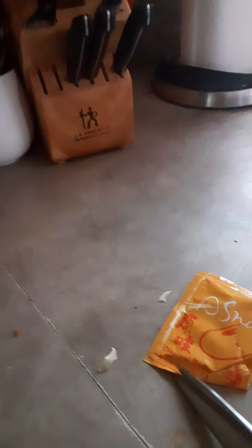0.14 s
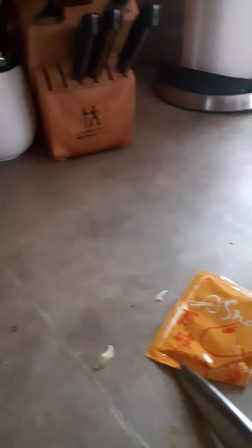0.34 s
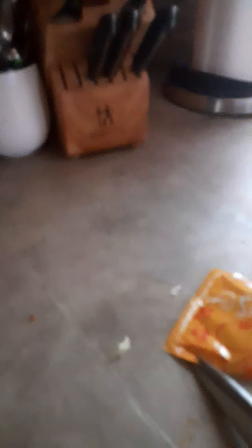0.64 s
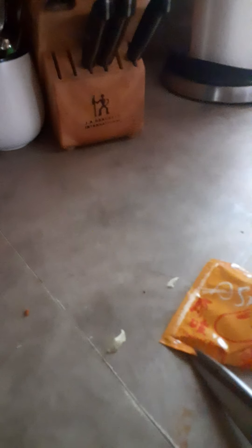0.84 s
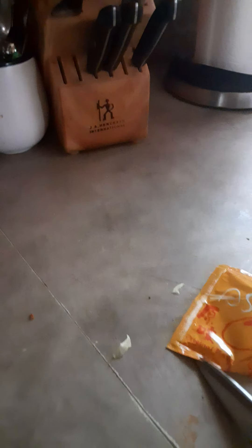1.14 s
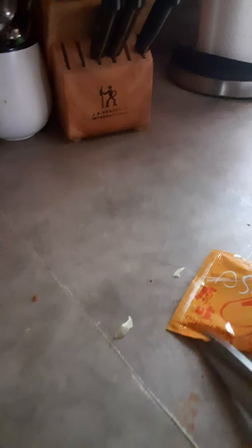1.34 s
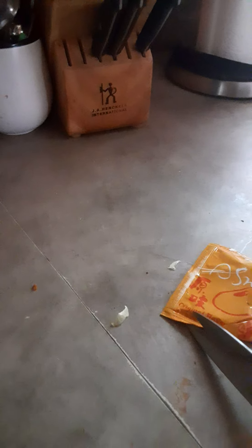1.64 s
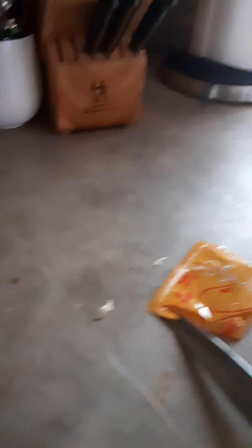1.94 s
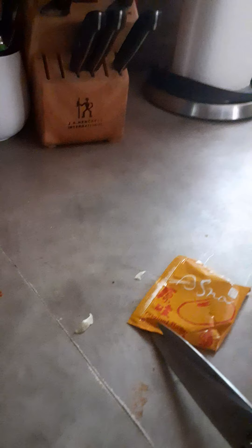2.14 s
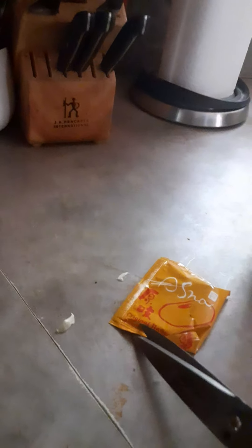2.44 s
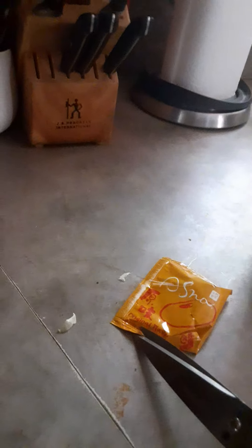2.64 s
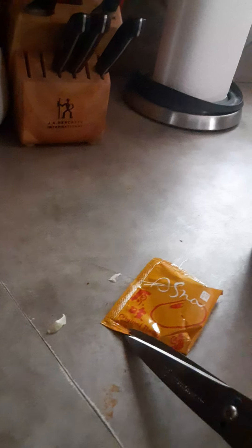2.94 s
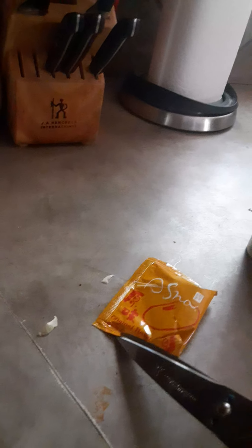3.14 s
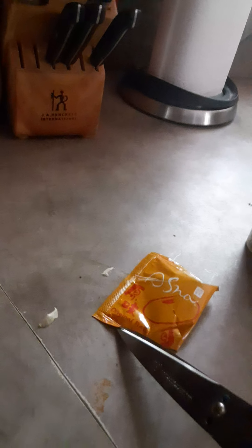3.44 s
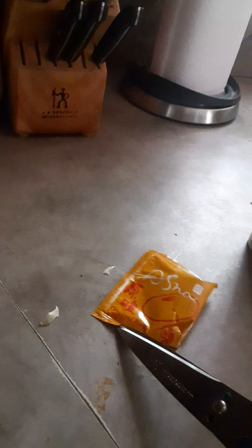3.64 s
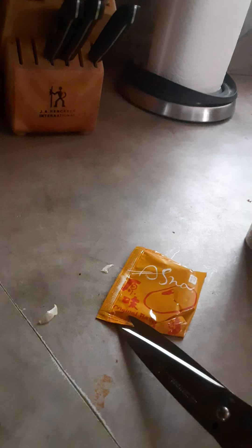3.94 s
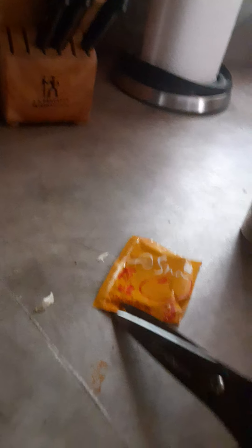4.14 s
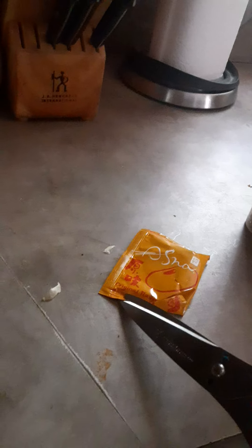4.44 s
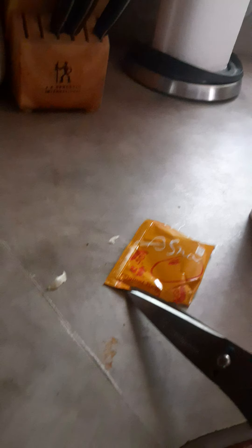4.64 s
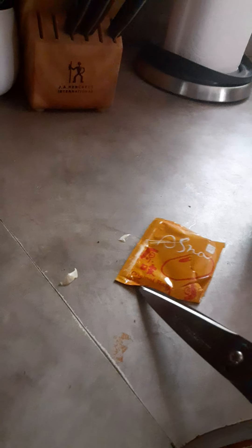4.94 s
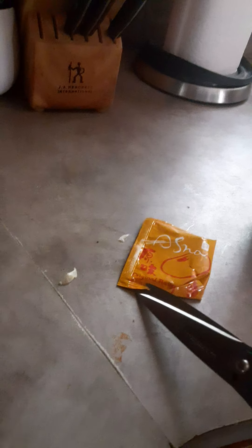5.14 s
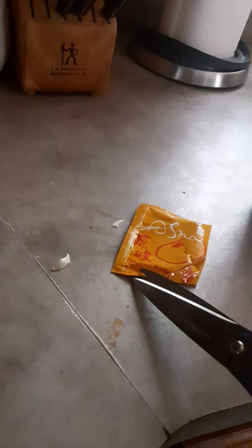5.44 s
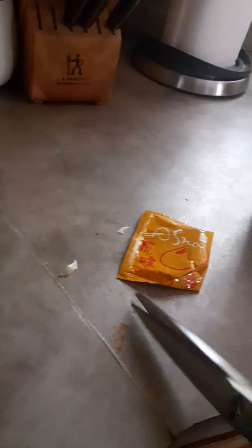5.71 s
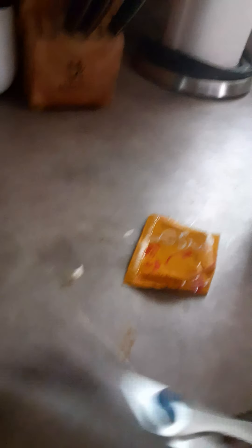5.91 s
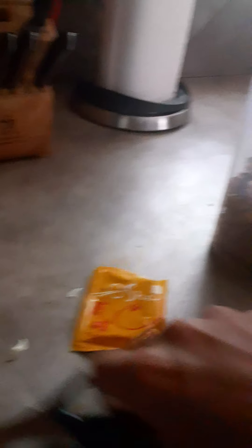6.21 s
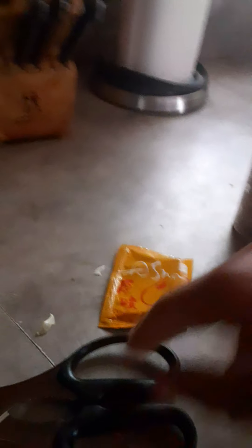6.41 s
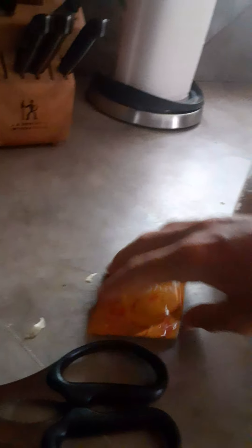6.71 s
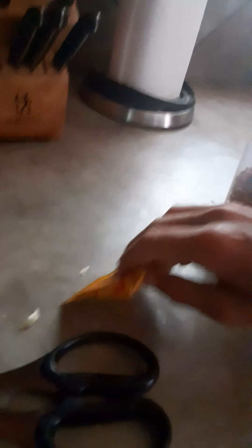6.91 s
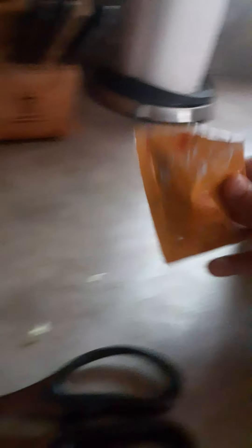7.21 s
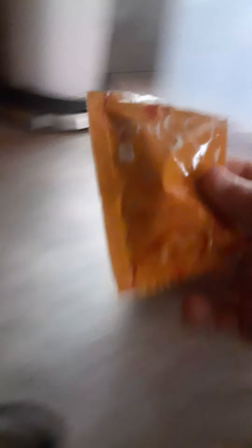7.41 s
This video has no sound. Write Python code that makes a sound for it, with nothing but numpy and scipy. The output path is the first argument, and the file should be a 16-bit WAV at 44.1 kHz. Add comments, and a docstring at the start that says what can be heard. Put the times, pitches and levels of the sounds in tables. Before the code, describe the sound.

Scissors snip sharply at a crinkling plastic sachet, then are put down on a stone counter with a louder scraping clatter.

```python
"""Kitchen scissors nibble at a plastic sachet on a stone counter, heard up close.
Each snip is a short run of tiny cracks that rings the blades, with a low jolt as the film gives way.
The film rustles and pops between cuts. The scissors are laid down, slid and dropped with a clatter,
and the sachet is picked up. The small kitchen rings over a mains hum and faint rumbles."""
import sys
import numpy as np
from scipy import signal
from scipy.fft import rfft, irfft, next_fast_len
from scipy.io import wavfile

SR = 44100
rng = np.random.default_rng(int(sys.argv[2]) if len(sys.argv) > 2 else 0)


def wav_out(sig):
    """Save sig, one row per channel (or a flat mono array), as 16-bit PCM at SR to the path in sys.argv[1]."""
    wavfile.write(sys.argv[1], SR, np.round(np.clip(np.atleast_2d(sig).T, -1, 1) * 32767).astype(np.int16))


N = 333725


def undb(db):
    """Decibels to gain."""
    return 10 ** (np.asarray(db) / 20)


def unit(x):
    """Scale to rms 1."""
    return x / np.sqrt(np.mean(x ** 2) + 1e-30)


def pan(left_db):
    """Stereo gains that put the left channel left_db above the right."""
    return undb(np.array([[1], [-1]]) * left_db / 2)


def add(out, x, start_s):
    """Mix a stereo sound into the track, dropping what falls outside."""
    i = int(start_s * SR)
    a, b = max(i, 0), min(i + x.shape[1], N)
    out[:, a:b] += x[:, a - i:b - i]


def band(x, low_hz, high_hz, order=2):
    """Causal band-pass."""
    return signal.sosfilt(signal.butter(order, [low_hz, high_hz], "band", fs=SR, output="sos"), x)


def highpass(x, hz, order):
    """Causal low cut."""
    return signal.sosfilt(signal.butter(order, hz, "high", fs=SR, output="sos"), x)


def colour(x, points):
    """EQ a sound along (freq_hz, gain_db) points."""
    hz, db = np.transpose(points)
    size = next_fast_len(x.shape[-1])
    bins_hz = np.arange(size // 2 + 1) * SR / size
    gain = undb(np.interp(np.log(bins_hz + 1), np.log(hz), db))
    return irfft(rfft(x, size) * gain, size)[..., :x.shape[-1]]


def stereo_noise(n, mono_below_hz):
    """Diffuse noise: centred in the bass, wide in the treble."""
    mid, side = rng.standard_normal((2, n))
    side = highpass(side, mono_below_hz, order=1)
    return np.array([mid + side, mid - side])


def resonate(x, modes):
    """Damped resonances side by side, each with gain 1 at its centre before its own dB."""
    out = np.zeros_like(x)
    for hz, width_hz, db in modes:
        r = np.exp(-np.pi * width_hz / SR)
        feedback = [1, -(1 + r * r) * np.cos(2 * np.pi * hz / SR), r * r]
        out += undb(db) * (1 - r * r) / 2 * signal.lfilter([1, 0, -1], feedback, x)
    return out


def damped(modes, factor):
    """Widen the modes: pressure on a part shortens its ring."""
    return [(hz, width_hz * factor, db) for hz, width_hz, db in modes]


def swell(t, rise_s, fall_s):
    """Force that builds to a crest at t = 0 and then lets go."""
    return np.exp(-np.where(t < 0, (t / rise_s) ** 2, np.abs(t / fall_s) ** 1.04))


def cracks(n, rate_hz, spread_db):
    """Tiny slips and fractures at random moments, most small and a few large."""
    fires = rng.random(n) < rate_hz / SR
    polarity = np.sign(rng.standard_normal(n))
    size_db = -spread_db * np.log(1 - .98 * rng.random(n))
    return fires * polarity * undb(size_db)


# The four registers of a contact (thump, body, ring, crackle): low_hz, high_hz
REGISTERS = [(75, 520), (520, 2500), (2500, 6500), (6500, 17000)]

def excite(force, levels_db, modes, rate_hz, spread_db, width, lag_s, pan_db, blow=(0, 0, 0, 0)):
    """Cracks follow the force and ring the modes; levels, pan and a blow at the crest go by register."""
    n, out = len(force), 0
    for k, (low_hz, high_hz) in enumerate(REGISTERS):
        mid, side = (unit(force * cracks(n, rate_hz, spread_db)) for _ in range(2))
        mid[np.argmax(force)] += blow[k] * np.sqrt(n)
        side = width * highpass(side, hz=1200, order=2)
        register_modes = [mode for mode in modes if low_hz <= mode[0] < high_hz]
        ring = resonate(np.array([mid + side, mid - side]), register_modes)
        left, right = band(ring, low_hz, high_hz)
        ring = np.array([unit(left), np.roll(unit(right), int(lag_s * SR))])
        out = out + ring * undb(levels_db[k]) * pan(pan_db[k])
    return out * np.sqrt(np.mean(force ** 2))


# Brightness tilt, one value a register: gain_db per brightness_db
BRIGHTNESS_TILT = [-0.58, -.5, .25, 0.49]

def contacts(rows, modes, balance_db, rise_share, **touch):
    """Play a cue list; balance and brightness offset each cue's level, register by register."""
    out = np.zeros((2, N))
    for crest_s, fall_s, level_db, brightness_db, *_ in rows:
        rise_s = rise_share * fall_s
        t = np.arange(-int(3 * rise_s * SR), int((4 * fall_s + .06) * SR)) / SR
        levels_db = level_db + np.array(balance_db) + brightness_db * np.array(BRIGHTNESS_TILT)
        add(out, excite(swell(t, rise_s, fall_s), levels_db, modes, **touch), crest_s + t[0])
    return out


# Partials of the mains hum: pitch_hz, level_db
HUM_PARTIALS = [(59.2, -76), (118.4, -67), (177.6, -81), (242.2, -76), (301.5, -71), (602.9, -86)]
# EQ of the room's air: freq_hz, gain_db
AIR_EQ = [(20, -41), (35, -24.5), (55, -15), (85, -10.5), (120, -2.5), (155, -12), (300, -10.5),
          (520, -19.5), (1000, -24), (2200, -25), (4000, -28), (6000, -35), (9700, -40), (12500, -34),
          (16000, -35)]
# Fader ride on hum and air together: time_s, gain_db
ROOM_FADER = [(0, 2), (3.3, 1.5), (4, 3), (6.9, 1.5), (7.15, -2)]

def room_tone(air_db=-63):
    """An appliance hums, wavering a little, over the still air of the room."""
    t, hum = np.arange(N) / SR, np.zeros(N)
    for hz, db in HUM_PARTIALS:
        waver = np.interp(t, np.linspace(0, N / SR, 60), rng.standard_normal(60))
        phase = 2 * np.pi * (hz * t + rng.random()) + .35 * waver
        hum += np.sqrt(2) * undb(db + 1.5 * waver) * np.sin(phase)
    air = unit(colour(stereo_noise(N, 610), AIR_EQ)) * undb(air_db)
    fader = undb(np.interp(t, *np.transpose(ROOM_FADER)))
    return (hum + air) * fader * pan(2.8)


# Faint low rumbles and thin squeaks: crest_s, fall_s, pitch_hz, level_db
RUMBLES = [(0.032, 0.14, 120, -53), (0.063, 0.43, 600, -65.5), (.24, .06, 55.4, -64), (.66, 0.15, 121, -56),
           (3.2, .17, 54, -60), (4.013, .07, 2080, -70), (5.149, 0.29, 58, -64), (5.52, .08, 2100, -69.5)]

def rumbles():
    """Soft swells of narrow noise, broader the higher they lie, a little to the left."""
    t, out = np.arange(N) / SR, 0
    for crest_s, fall_s, hz, db in RUMBLES:
        mode = [(hz, 18 + .11 * hz, 0)]
        noise = unit(resonate(resonate(rng.standard_normal(N), mode), mode))
        out = out + undb(db) * swell(t - crest_s, .64 * fall_s, fall_s) * noise
    return out * pan(5.5)


# Gliding strokes: crest_s, rise_s, fall_s, level_db
GLIDE_STROKES = [(.20, 0.078, 0.12, -46), (.30, 0.055, 0.069, -53.5), (6.42, 0.092, 0.13, -45.5),
                 (6.58, 0.08, 0.047, -49.5)]
# EQ of the friction hiss: freq_hz, gain_db
GLIDE_EQ = [(1500, -28), (4000, -12), (5100, -17.5), (5700, -6.5), (6600, -17.5), (8300, -10), (9500, -15),
            (12000, -5.5), (15000, -4.5), (17000, -3)]

def glides():
    """Smooth surfaces glide over the stone with a fine hiss, brightest at the very top."""
    t = np.arange(N) / SR
    speed = sum(undb(db) * swell(t - at, rise, fall) for at, rise, fall, db in GLIDE_STROKES)
    return speed * unit(colour(stereo_noise(N, 4000), GLIDE_EQ))


# Resonances of blades on film, the voice of the sachet: pitch_hz, width_hz, gain_db
FILM_MODES = [(179, 170, -13), (303, 26, 0.5), (501.5, 170, -6.5), (546, 170, -5.5), (817, 360, 2),
              (1208, 180, 4.5), (1304, 130, -6.5), (1480, 1600, -18.5), (2155, 720, -7.5), (2628, 410, -7),
              (3500, 1100, -1), (4385, 700, -1.5), (5630, 510, 0.5), (8110, 650, 2.5), (8600, 500, -1.5),
              (9600, 1700, -14), (11900, 5400, 1.5), (15600, 1100, -2.5)]
# Shifts of the sachet: crest_s, fall_s, level_db, brightness_db
SACHET_SHIFTS = [(.27, 0.049, -65.5, -11), (1.355, .03, -57, -5.5), (1.50, 0.031, -62, -9.5),
                 (1.615, .024, -61, -0.5), (1.83, 0.058, -74, 6), (2.18, 0.096, -72.5, 13.5),
                 (3.778, 0.032, -54.5, 5), (4.18, 0.071, -63, -2), (4.45, 0.13, -71.5, 12.5),
                 (4.642, .008, -51.5, 11.5), (5.07, 0.074, -61, 1), (5.615, .028, -51.5, 4.5),
                 (5.675, .025, -55.5, -5), (5.78, 0.013, -61.5, 8.5)]

def rustles():
    """The sachet shifts under the blades in soft swells of crackle."""
    return contacts(SACHET_SHIFTS, FILM_MODES, balance_db=[4, 0, -5.5, .2], rise_share=.9,
                    rate_hz=6800, spread_db=3, width=.91, lag_s=.0001, pan_db=[1.4, .5, 1.3, -.5])


# Small hard ticks: start_s, pitch_hz, width_hz, peak_db
HARD_TICKS = [(.389, 2240, 990, -27), (.389, 6800, 3000, -46), (6.812, 3680, 2010, -32.5),
              (6.838, 2190, 698, -33)]

def ticks(contact_s=.0022):
    """A very brief contact rings one broad resonance."""
    out, t = np.zeros((2, N)), np.arange(SR // 20) / SR
    for start_s, hz, width_hz, peak_db in HARD_TICKS:
        push = stereo_noise(len(t), 4600) * np.exp(-t / contact_s)
        push = resonate(push, [(hz, 2 * width_hz, 0)])
        ring = resonate(push, [(hz, width_hz, 0)])
        add(out, undb(peak_db) * ring / np.abs(ring).max(), start_s)
    return out


# Bites of the blades: crest_s, fall_s, level_db, brightness_db, jolt_pitch_hz, jolt_peak_db
BITES = [(.887, 0.0079, -30, 2, 288, -31), (.932, 0.0066, -37, 2.5, 275, -32),
         (1.0215, .008, -29, 3, 326, -28), (1.026, .005, -29.5, -6.5, 517, -27.5),
         (3.133, .012, -33.5, 8, 323, -31.5), (3.256, 0.0097, -35.5, 10, 322, -35.5),
         (3.364, 0.0073, -40, 12.5, 325, -38.5), (4.617, .008, -29.5, 14.5, 882, -36),
         (4.656, 0.0081, -34.5, 11.5, 351, -31), (4.7605, .013, -28.5, 12, 264, -36)]

def snips():
    """The blades bite through the film: a quick run of cracks with a blow at its crest."""
    return contacts(BITES, FILM_MODES, balance_db=[-5, .1, -14.5, -.2], rise_share=.31,
                    rate_hz=9000, spread_db=4, blow=[.23, .31, .15, .1],
                    width=.93, lag_s=.00012, pan_db=[4.5, -.5, 3, -.2])


def jolts(delay_s=.002, rise_s=.004, decay_s=.0074, lag_s=.00012):
    """As the film gives way the scissors jolt: a low note of a few cycles, damped by the hand."""
    out, t = np.zeros((2, N)), np.arange(SR // 10) / SR
    envelope = (1 - np.exp(-(t / rise_s) ** 2)) * np.exp(-t / decay_s)
    envelope /= envelope.max()
    for crest_s, *_, hz, peak_db in BITES:
        note = np.sin(2 * np.pi * hz * np.array([t, t - lag_s])) * envelope
        add(out, note * undb(peak_db) * pan(2.5), crest_s + delay_s)
    return out


# Hollow resonances of hand-held scissors on stone: pitch_hz, width_hz, gain_db
HELD_SCISSOR_MODES = [(230, 28, 2.5), (330, 40, -15), (666, 55, 0.5), (765, 50, -6.5), (1115, 54, -8.5),
                      (1254, 50, -3), (2087, 120, -9.5), (3060, 110, -4.5), (3934, 150, 1),
                      (4840, 200, -9.5), (6900, 620, -4), (8800, 900, 0), (11500, 2900, -5),
                      (14800, 2200, -4.5)]
# Scissors hitting the counter, held and then free: crest_s, fall_s, level_db, brightness_db
COUNTER_HITS = [(1.027, 0.0054, -29, -7), (5.990, .0055, -15.5, -7), (6.014, 0.0074, -34, -17),
                (6.2568, .003, -17, 2), (6.272, .014, -36, 2), (6.395, .0055, -15, -17),
                (6.416, 0.014, -28, -7.5), (6.4307, .0057, -17, -16.5), (6.438, 0.0039, -24.5, -1),
                (6.447, 0.0089, -24.5, -18), (6.469, .012, -31, -21)]
LET_GO_S = 6.35

def held_knocks():
    """The scissors knock on the counter while still in the hand, their ring deadened."""
    hits = [hit for hit in COUNTER_HITS if hit[0] < LET_GO_S]
    return contacts(hits, damped(HELD_SCISSOR_MODES, 2.5), balance_db=[-7.5, -.3, -.5, .8],
                    rise_share=.13, rate_hz=10000, spread_db=4.5, blow=[.8, .53, .28, .7],
                    width=.9, lag_s=.00005, pan_db=[1.9, .6, 2.6, .5])


# Popping creases: crest_s, fall_s, level_db, brightness_db
CREASE_POPS = [(1.349, 0.0047, -42.5, -5), (1.388, 0.0046, -51.5, -7), (1.851, 0.0067, -62.5, 17),
               (2.088, .007, -54, -1.5), (3.739, 0.0022, -58, 22), (3.752, 0.0038, -42.5, 32),
               (5.059, .0043, -50, 7), (5.078, 0.0029, -57, 20), (5.597, .005, -54.5, -8),
               (5.623, 0.003, -49.5, 25), (5.764, .005, -50.5, 19)]

def pops():
    """Single creases of the film pop, each a few milliseconds of dense cracks."""
    return contacts(CREASE_POPS, FILM_MODES, balance_db=[-5, .5, -13.5, -1], rise_share=.43,
                    rate_hz=14000, spread_db=6, blow=[.52, .32, .3, .27],
                    width=1, lag_s=.0001, pan_db=[2.2, .5, 1.3, .67])


# Resonances of the bare blades: pitch_hz, width_hz, gain_db
BARE_STEEL_MODES = [(261.6, 180, 0), (825, 260, -1), (1260, 44, -4), (2260, 900, -5), (3500, 900, -9),
                    (4410, 1000, -6.5), (5220, 700, 2.5), (6100, 990, -3.5), (6810, 780, -6.5),
                    (8350, 640, -5.5), (8680, 670, 1.5), (9830, 520, 3.5), (10700, 590, -1),
                    (13270, 1400, -9)]
# Blades closing: crest_s, fall_s, level_db, brightness_db
BLADE_SNAPS = [(3.397, 0.0037, -34, 8), (4.761, .0014, -21.5, 23), (5.7952, .003, -32.5, 21)]

def snaps():
    """The blades snap shut, steel on steel, with a bright click."""
    return contacts(BLADE_SNAPS, damped(BARE_STEEL_MODES, 1.4), balance_db=[-1, .2, 2, .6],
                    rise_share=.25, rate_hz=14000, spread_db=2.5, blow=[.59, .5, .6, .53],
                    width=.88, lag_s=.00012, pan_db=[2.5, 1, 2, -.5])


# Contour of the push along the counter: time_s, scrape_db, drone_db
SLIDE_CONTOUR = [(6.035, -33, -38.5), (6.085, -37, -39.5), (6.121, -31, -44), (6.147, -36, -36.5),
                 (6.165, -27, -35), (6.249, -39.5, -39), (6.257, -26.5, -35), (6.289, -32, -34.5),
                 (6.305, -38, -37.5)]

def slide(edge_s=.013):
    """The handles judder along the stone, ringing freely for as long as they are pushed."""
    times_s, scrape_db, drone_db = np.transpose(SLIDE_CONTOUR)
    t = np.arange(times_s[0] - .05, times_s[-1] + .1, 1 / SR)
    outside_s = np.abs(t - np.clip(t, times_s[0], times_s[-1]))
    force = undb(np.interp(t, times_s, scrape_db)) * np.exp(-outside_s / edge_s)
    thump_db = np.interp(t, times_s, drone_db - scrape_db) - 1  # the lowest register carries the drone
    scrape = excite(force, [thump_db, -.5, -13, -13], HELD_SCISSOR_MODES, rate_hz=10000, spread_db=1,
                    width=.79, lag_s=.00003, pan_db=[1.9, .35, 2, .5])
    out = np.zeros((2, N))
    add(out, scrape, t[0])
    return out


# Resonances of loose scissors on stone: pitch_hz, width_hz, gain_db
LOOSE_SCISSOR_MODES = [(130, 25, -13), (240, 45, 0), (345, 40, -6), (595, 50, -7), (672, 55, 2),
                       (775, 50, -2), (910, 50, -10), (1160, 70, -5), (1300, 70, 1), (1390, 70, -1),
                       (2100, 130, -10), (2650, 250, -2), (3050, 200, -2), (3980, 200, 2), (5100, 600, -9),
                       (6900, 700, -2), (8900, 900, 0), (11500, 2500, -5), (14800, 2000, -3)]

def drop():
    """Let go, the scissors clatter on the counter; the hard landings deaden their ring."""
    hits = [hit for hit in COUNTER_HITS if hit[0] >= LET_GO_S]
    return contacts(hits, damped(LOOSE_SCISSOR_MODES, 2.3), balance_db=[-7, .3, -1.3, .9],
                    rise_share=.16, rate_hz=10000, spread_db=4, blow=[.7, .56, .35, .6],
                    width=.9, lag_s=.00005, pan_db=[2.2, .6, 2.5, .5])


# Fingertips on the sachet: crest_s, fall_s, level_db, brightness_db
FINGER_GRABS = [(6.70, 0.017, -51.5, 0), (6.76, .022, -57.5, 13), (6.819, 0.0046, -49.5, 6.5),
                (6.86, 0.048, -62, 5), (6.99, .035, -64, 4.5), (7.023, 0.0067, -59, 10)]

def pick_up():
    """Fingertips drag the sachet off the stone with a thin crinkle."""
    return contacts(FINGER_GRABS, FILM_MODES, balance_db=[-12, .7, 3.5, .3], rise_share=.81,
                    rate_hz=6800, spread_db=4, width=1, lag_s=.0001, pan_db=[1.4, .62, 1.2, -.38])


# Reverb of the small kitchen: freq_hz, t60_s, gain_db
KITCHEN_REVERB = [(120, 0.69, -8), (300, 0.36, -1.5), (1050, 0.42, -7), (2564, .48, -6), (5000, 0.43, -7.5),
                  (8810, 0.23, -9.5), (15000, 0.35, -11)]

def kitchen(x, build_s, wet_db):
    """Tiles and cupboards answer within milliseconds; each octave dies away at its own pace."""
    t, response = np.arange(int(.8 * SR)) / SR, 0
    hz, t60s, gains = np.transpose(KITCHEN_REVERB)
    for low_hz in 66 * 2. ** np.arange(8):
        log_centre = np.log(low_hz * np.sqrt(2))
        t60_s, gain_db = (np.interp(log_centre, np.log(hz), column) for column in (t60s, gains))
        envelope = (1 - np.exp(-(t / build_s) ** 2)) * np.exp(-np.log(1000) * t / t60_s)
        envelope /= np.linalg.norm(envelope)
        octave = unit(band(stereo_noise(len(t), 690), low_hz, 2 * low_hz, order=4))
        octave *= np.sqrt(2 * low_hz / SR)  # this octave's share of white noise
        response = response + undb(gain_db + wet_db) * octave * envelope
    return signal.fftconvolve(x, response, axes=1)[:, :N]


def scene():
    """Cutting and clatter, each with its own kitchen reverb, over the room tone and rumbles."""
    cutting = snips() + snaps() + pops() + rustles() + pick_up() + jolts() + ticks() + glides()
    clatter = held_knocks() + slide() + drop()
    reverb = kitchen(cutting, build_s=.0033, wet_db=-2.5) + kitchen(clatter, build_s=.0042, wet_db=-1.5)
    return cutting + clatter + reverb + room_tone() + rumbles()


def record(dry, top_hz=15950):
    """Clip peaks at full scale and cut the very top steeply."""
    lowpass = signal.ellip(10, .2, 70, top_hz, fs=SR, output="sos")
    return signal.sosfilt(lowpass, np.clip(dry, -1, 1))


dry = scene()
out = record(dry)
wav_out(out)
```